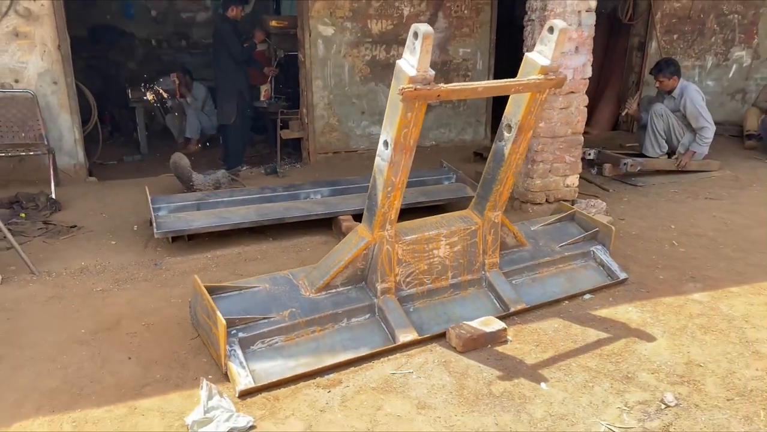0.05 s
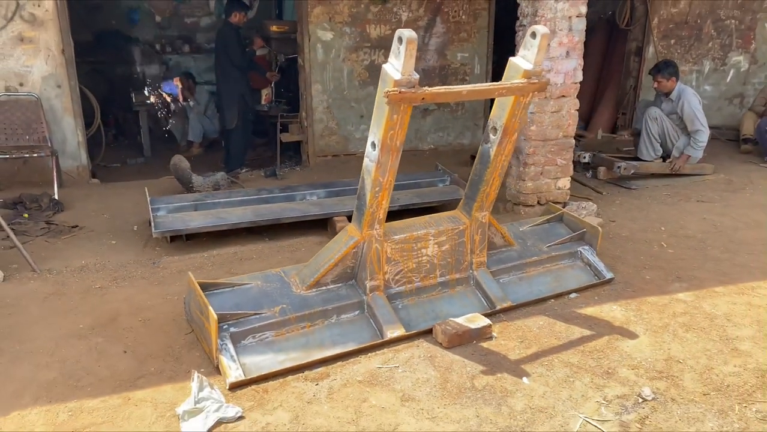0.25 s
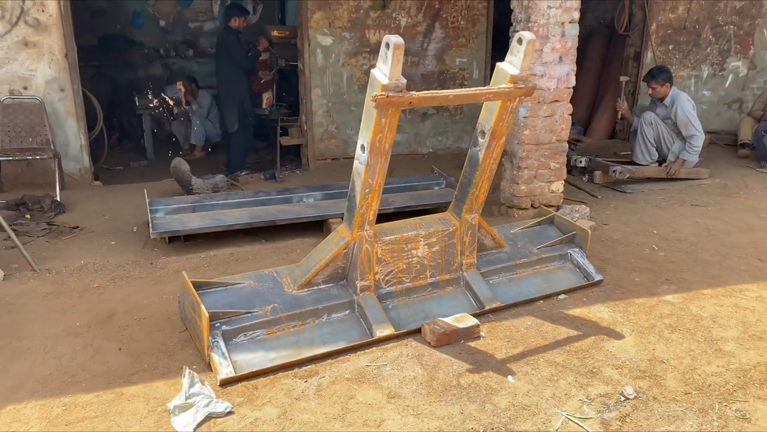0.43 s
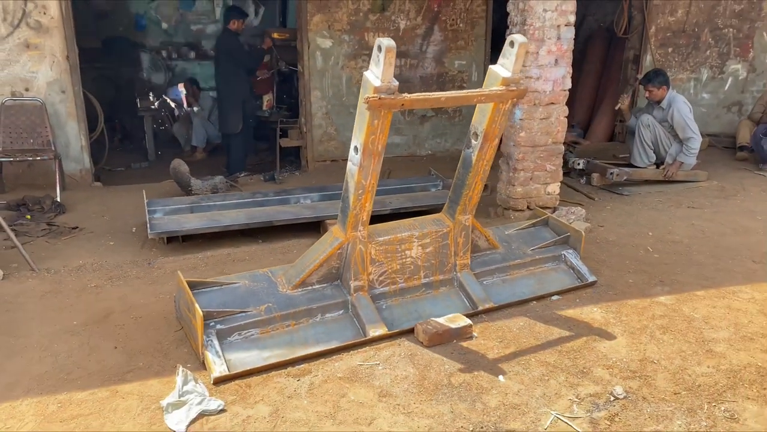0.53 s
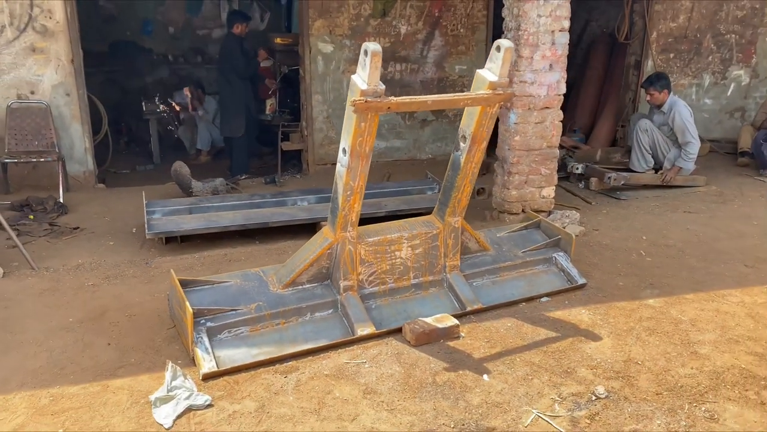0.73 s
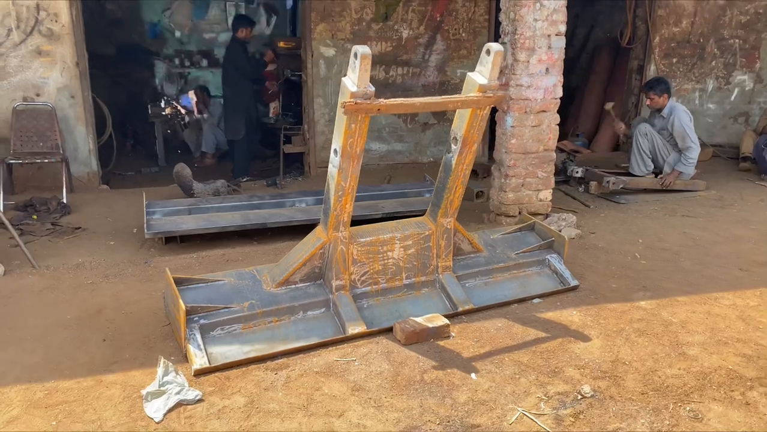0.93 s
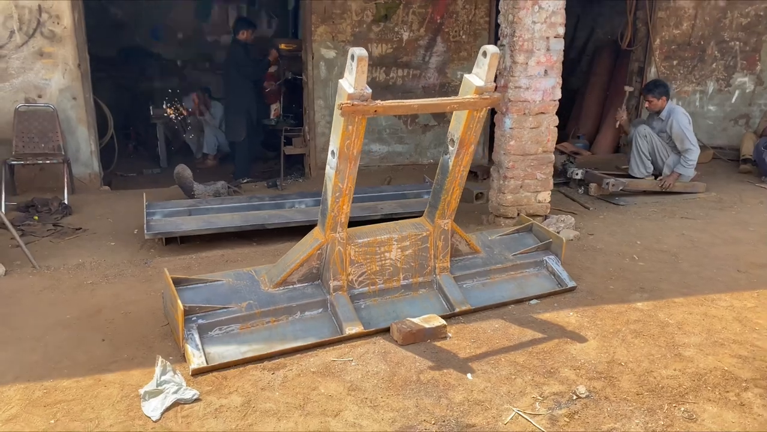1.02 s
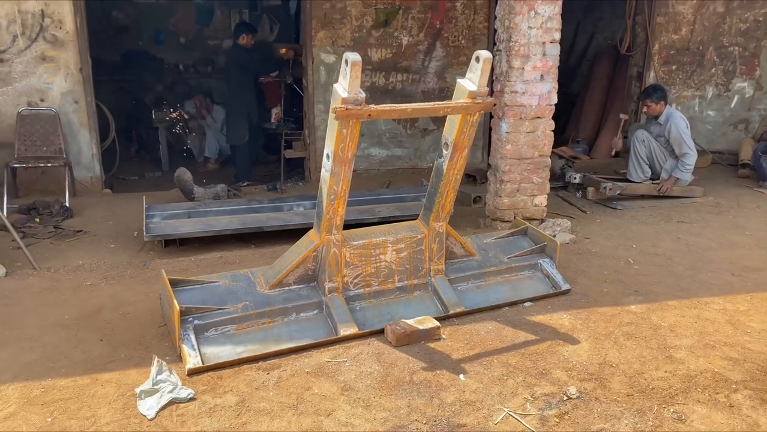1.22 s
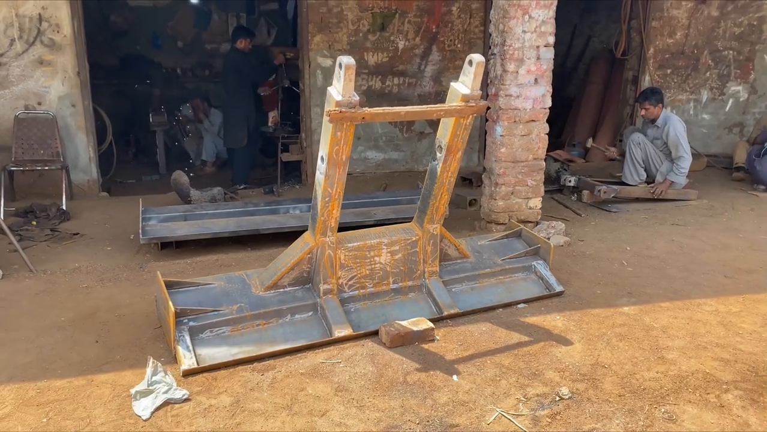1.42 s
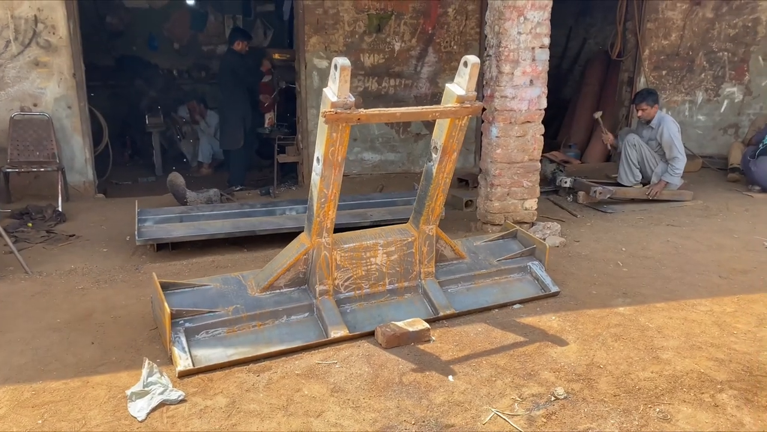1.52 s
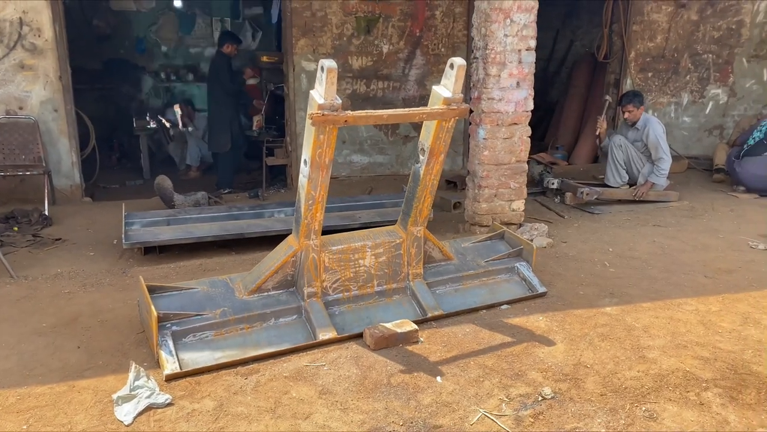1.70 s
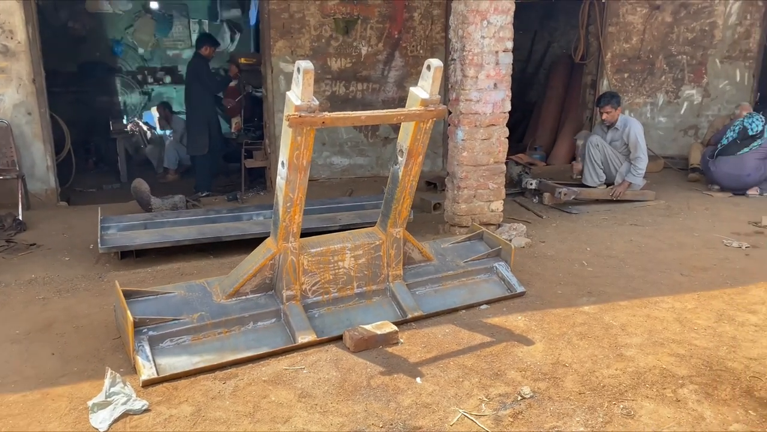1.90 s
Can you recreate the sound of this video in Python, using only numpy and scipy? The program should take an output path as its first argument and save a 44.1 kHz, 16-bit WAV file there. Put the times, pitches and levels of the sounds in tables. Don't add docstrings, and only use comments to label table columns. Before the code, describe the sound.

A hammer strikes a steel sheet three times in a workshop yard, each clang ringing briefly

```python
import sys
import numpy as np
from scipy import signal
from scipy.fft import rfft, irfft
from scipy.io import wavfile
from scipy.ndimage import uniform_filter1d

SR = 44100
rng = np.random.default_rng(int(sys.argv[2]) if len(sys.argv) > 2 else 0)


def log_audio(samples):
    frames = np.atleast_2d(samples).T
    limited = np.clip(frames, -1, 1)
    pcm = np.round(limited * 32767).astype(np.int16)
    wavfile.write(sys.argv[1], SR, pcm)


def decibels_to_gain(level_db):
    exponent = np.asarray(level_db, float) / 20
    return 10 ** exponent


N = 85995
TIME_S = np.arange(N) / SR
RUN_IN_S = 0.4
HALVES = np.array([[0.5], [-0.5]])


def at_hz(points, hz):
    table = np.array(points)
    return np.interp(np.log(hz), np.log(table[:, 0]), table[:, 1])


def drift(rate):
    r = np.exp(-80 * np.pi * rate / SR)
    slow = signal.lfilter([1], [1, -2 * r, r * r], rng.standard_normal(N // 40 + 2002))[2000:]
    return np.interp(np.arange(N) / 40, np.arange(len(slow)), slow / slow.std())


# (frequency [Hz], difference [dB])
LEFT_OVER_RIGHT = [(60, -6), (240, -2.5), (950, -2), (3770, 0), (15000, -1.5)]


def banded_noise(spectrum, alike, shape):
    out, power = 0, 0
    edges = 20 * 2 ** np.arange(0, 9.8, 0.5)
    white = rng.standard_normal((2, 2, N + 8000))
    for k, (low, high) in enumerate(zip(edges, edges[1:])):
        if spectrum[0][0] >= high or low >= spectrum[-1][0]:
            continue
        hz = np.sqrt(low * high)
        band = signal.butter(2, [low, high], "band", fs=SR, output="sos")
        mid, side = signal.sosfilt(band, white[k % 2])[:, -N:]
        likeness = np.clip(alike(hz), -1, 1)
        stereo = np.sqrt(1 + likeness) * mid + np.sqrt(1 - likeness) * side * [[1], [-1]]
        gain = decibels_to_gain(at_hz(spectrum, hz))
        power += gain ** 2 * 4 * (high - low) / SR
        sides = decibels_to_gain(at_hz(LEFT_OVER_RIGHT, hz) * HALVES)
        out = out + gain * sides * shape(hz) * stereo
    return out / np.sqrt(power)


# (time [s], strength [dB], brightness [dB per octave])
BLOWS = [
    (-.345, -4, 2.8),
    (0.2178, -10, 0.57),
    (.783, -11, 0.6),
    (1.3381, -12.5, 0.25),
]


def after_blows(hz, t60, rise_s):
    power = 0
    for s, db, bright_db in BLOWS:
        t = np.maximum(TIME_S - s, 0)
        fading = decibels_to_gain(db + bright_db * np.log2(hz / 1000) - 60 * t / t60)
        power = power + (fading * (1 - np.exp(-t / rise_s))) ** 2
    return np.sqrt(power)


# (frequency [Hz], phase [radians])
LEFT_AHEAD = [(400, 0), (1550, 0.96), (2240, 1.8), (3450, 1.94), (4800, 4.44), (6400, 6.9), (8700, 8.2),
              (11000, 7.5), (14000, 8.8)]
GRAZE_S = 0.0094


def modes(table, spread_db):
    before_s = 0.025
    spread_s = 0.004
    out = np.zeros((2, N + int(RUN_IN_S * SR)))
    for s, db, bright_db in BLOWS:
        for hz, level_db, t60 in table:
            late_s = spread_s * np.sqrt(1000 / hz) * rng.uniform(0.6, 1.1)
            start = int((RUN_IN_S + s - before_s + late_s) * SR)
            length = min(out.shape[1] - start, int((t60 + before_s) * SR))
            t = np.arange(length) / SR - before_s

            stir_db = min(-18 + 2.5 * rng.normal(), -6)
            stir = decibels_to_gain(stir_db + 20 * np.minimum(t, 0) / GRAZE_S) * (hz > 1800)
            ring = decibels_to_gain(-60 * t / t60) * (1 - (1 - stir) * np.exp(-t.clip(0) * hz))
            shape = np.where(t < 0, stir, ring)

            size = decibels_to_gain(db + level_db + bright_db * np.log2(hz / 1000) + spread_db * rng.normal())
            sides = decibels_to_gain(at_hz(LEFT_OVER_RIGHT, hz) * HALVES)
            shift = (at_hz(LEFT_AHEAD, hz) + rng.normal(0, 0.3)) * HALVES
            tone = np.sin(2 * np.pi * (hz * t + rng.random()) + shift)
            out[:, start:start + length] += size * shape * sides * tone
    return out


# (frequency [Hz], level [dB], time to fall 60 dB [s])
SHEET_MODES = [(526.5, -13, .16), (620.3, -19.5, 0.21), (859.6, -3, 0.1), (974.6, -19, 0.56),
               (1103, -3.5, 0.21), (1325, -23.5, 0.095), (1413.4, 6.5, 0.073), (1673, -9.5, 0.22),
               (2005, 2.5, 0.043), (2800, -6.5, 0.079), (3013, -6, 0.092), (3540, -10.5, 0.063),
               (4635, -10, 0.086), (6650, -6.5, 0.03)]
# (frequency [Hz], level [dB], time to fall 60 dB [s])
HEAD_MODES = [(2129, -10.5, 0.26), (2148, -25, 0.14), (2866, -13.5, 0.11), (3556, -21, 0.41),
              (3970, -3.5, 0.085), (5310, -6.5, 0.02), (5706, -21, 0.26), (6103, -17, 0.11),
              (6290, -22, 0.24), (6635, -13, .2), (7240, -23.5, 0.23), (7925, -26, 0.28),
              (9660, -18, 0.033)]
# (frequency [Hz], level of each [dB])
LESSER_MODES = [(180, -58), (300, -59.5), (828, -0.5), (975, -35.5), (1110, -13), (1850, -9.5), (5440, -21),
                (6510, -22.5), (15000, 6.5)]


def sheet():
    hz = np.linspace(19, 101, num=150) ** 2 * rng.uniform(0.99, 1.01, size=150)
    t60 = 0.15 * (hz / 1000) ** -0.004 * rng.uniform(0.7, 1.3, size=150)
    level_db = -24 + at_hz(LESSER_MODES, hz) - 8.6 * (hz < 1600)
    lesser = list(zip(hz, level_db, t60))
    return modes(SHEET_MODES + HEAD_MODES, spread_db=3.5) + modes(lesser, spread_db=8)


# (frequency [Hz], density [dB per Hz])
CRACK_COLOUR = [(59, -63), (100, -75), (930, 0), (1520, -7.5), (4290, -14.5), (6560, -21.5), (8640, -43),
                (13200, -38), (16000, -60)]


def crack():
    graze = 0
    for s, db, _ in BLOWS[1:]:
        t = TIME_S - s
        swell = decibels_to_gain(db - 14 + 20 * t.clip(-1, 0) / GRAZE_S)
        graze = graze + swell * (TIME_S < s) * (TIME_S > s - 3 * GRAZE_S)

    def alike(hz):
        return 0.61 * np.cos(at_hz(LEFT_AHEAD, hz))

    def shape(hz):
        return decibels_to_gain(2) * after_blows(hz, t60=0.05, rise_s=0.00013) + graze * decibels_to_gain(7) * (hz > 1200)

    return banded_noise(CRACK_COLOUR, alike, shape)


# (frequency [Hz], density [dB per Hz])
RATTLE_COLOUR = [(59, -2), (100, -34), (718, -11.5), (1590, -4), (6480, -21.5), (10500, -40),
                 (12200, -66.5), (13200, -38), (15000, -51)]


def rattle():
    def alike(hz):
        return 0.96 * np.cos(at_hz(LEFT_AHEAD, hz))

    def shape(hz):
        rough = decibels_to_gain(-7.5 + 2 * drift(21.5))
        return rough * after_blows(hz, t60=0.47 * (hz / 1000) ** -0.12, rise_s=0.0031)

    return banded_noise(RATTLE_COLOUR, alike, shape)


# (frequency [Hz], level [dB])
NEAR_COLOUR = [(320, 38.5), (500, -7.5), (1000, 11), (2000, 8.5), (4000, 9.5), (8000, 6), (15000, 10.5)]
# (frequency [Hz], level [dB])
FAR_COLOUR = [(150, -11), (500, 2.5), (1000, -4), (2000, 3), (4000, -5), (8000, -2.5), (15000, -63.5)]
# (frequency [Hz], likeness [-1 to 1])
NEAR_ALIKE = [(60, .95), (240, 0.72), (600, 0.68), (1200, 0.13), (3770, 0.21), (15000, 0.55)]
# (frequency [Hz], likeness [-1 to 1])
FAR_ALIKE = [(60, 1), (180, 0.89), (550, 0.5), (1650, -0.28), (4970, 0.037), (15000, 0.25)]


def far_alike(hz):
    return at_hz(FAR_ALIKE, hz)


def yard(clang):
    def dying(t, t60, rise_s):
        return decibels_to_gain(-60 * t / t60) * (1 - np.exp(-t / rise_s)) / np.sqrt(t60 * SR / 14)

    def near_alike(hz):
        return at_hz(NEAR_ALIKE, hz)

    def near_shape(hz):
        return decibels_to_gain(-1) * dying(TIME_S, t60=0.23 * (hz / 1000) ** -0.11, rise_s=0.018)

    def far_shape(hz):
        t = np.maximum(TIME_S - 0.09, 0)
        return decibels_to_gain(-13.5) * dying(t, t60=0.73 * (hz / 1000) ** -0.19, rise_s=0.15)

    near = banded_noise(NEAR_COLOUR, near_alike, near_shape)
    far = banded_noise(FAR_COLOUR, far_alike, far_shape)
    return signal.fftconvolve(clang[:1], near + far, axes=1)[:, :clang.shape[1]]


# (time [s], level [dB])
TICKS = [
    (1.213, -43.5),
    (1.227, -46.5),
]


def grit():
    shape = 0
    for s, db in TICKS:
        shape = shape + decibels_to_gain(db - 60 * (TIME_S - s).clip(0, 1) / 0.02) * (TIME_S >= s)
    bright = signal.butter(2, 5000, "high", fs=SR, output="sos")
    return signal.sosfilt(bright, shape * rng.standard_normal((2, N)))


# (time [s], length [s], edge pitch [Hz], top pitch [Hz], level [dB])
CHIRPS = [
    (.136, .036, 4300, 4700, -45),
    (1.12, .034, 4300, 4750, -54),
    (1.205, .028, 4100, 4500, -60),
    (1.829, .064, 4500, 6100, -62),
    (1.925, .034, 4800, 5850, -62),
]


def sparrows():
    out = np.zeros(N + SR)
    for s, length, edge_hz, top_hz, db in CHIRPS:
        u = np.arange(int(length * SR)) / (length * SR)
        arch = np.minimum(1.15 * np.sin(np.pi * u), 1)
        warble = 1 + 0.02 * drift(150)[:len(u)]
        hz = (edge_hz + (top_hz - edge_hz) * arch) * warble
        turn = 2 * np.pi * np.cumsum(hz) / SR
        whistles = np.sin(turn) + decibels_to_gain(-4) * np.sin(1.15 * turn)
        out[int(s * SR):][:len(u)] += decibels_to_gain(db) * np.sqrt(np.sin(np.pi * u)) * whistles
    left = out[:N]
    return np.stack([left, 2.3 * np.roll(left, shift=3)])


# (time [s], level [dB])
BACKGROUND = [
    (0, -38.5),
    (0.228, -38),
    (.28, -52.5),
    (.55, -47.5),
    (.75, -49),
    (1.05, -50),
    (1.3, -51.5),
    (1.65, -53),
    (1.95, -52.5),
]
# (frequency [Hz], density [dB per Hz])
RUMBLE_COLOUR = [(12, -57), (20, -39), (69, -2.5), (172, 2.5), (225, -14.5), (387, -12), (532, -21),
                 (585, -23), (900, -40), (1170, -66), (1980, -120)]
# (frequency [Hz], density [dB per Hz])
HISS_COLOUR = [(350, -35.5), (600, -12.5), (906, -6), (1930, -10.5), (3990, -18.5), (6030, -17),
               (10900, -28), (14500, -15.5), (16000, -56)]


def machinery():
    background_db = np.interp(TIME_S, *np.transpose(BACKGROUND))
    together_db = 1.5 * drift(16)

    def rumble_shape(hz):
        return decibels_to_gain(background_db + together_db + 1.6 * drift(16.7))

    def hiss_shape(hz):
        return decibels_to_gain(-58 + (background_db + 52.5) + 0.4 * drift(24))

    rumble = banded_noise(RUMBLE_COLOUR, far_alike, rumble_shape)
    return rumble + banded_noise(HISS_COLOUR, far_alike, hiss_shape)


def scene():
    clang = sheet()
    clang[:, -N:] += crack() + rattle()
    flutter = decibels_to_gain(1.3 * drift(2.67))
    echoes = flutter * yard(clang)[:, -N:]
    return clang[:, -N:] + echoes + grit() + sparrows() + machinery()


def low_pass(x):
    return signal.sosfilt(signal.butter(12, 16470, fs=SR, output="sos"), x)


def record(dry):
    level_db = 10 * np.log10(uniform_filter1d(np.mean(dry ** 2, axis=0), size=600) + 1e-12)
    r = np.exp(-1 / (0.022 * SR))
    wanted_db = -0.17 * np.maximum(level_db + 45.5, 0)
    duck_db = signal.lfilter([(1 - r) ** 2], [1, -2 * r, r * r], wanted_db)

    hz = np.fft.rfftfreq(N, 1 / SR)
    lows = irfft(rfft(dry) / (1 + (hz / 220) ** 6), N)
    x = (dry - lows) * decibels_to_gain(duck_db) + lows * decibels_to_gain(1.7 * duck_db)
    x = 1.21 * np.tanh(x / 1.007)

    notch = decibels_to_gain(-30 * np.exp(-((hz - 12150) / 650) ** 4))
    fill = np.clip((level_db + 19) / 10, 0, 1)
    x = fill * x + (1 - fill) * irfft(rfft(x) * notch, N)
    top_cut = signal.cheby2(10, 60, 16200, fs=SR, output="sos")
    return low_pass(signal.sosfilt(top_cut, x))


dry = scene()
out = record(dry)
log_audio(out)
```